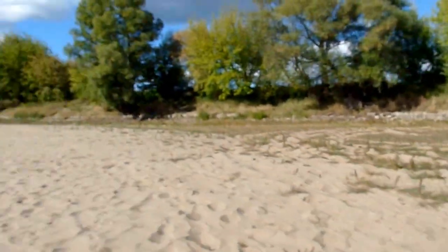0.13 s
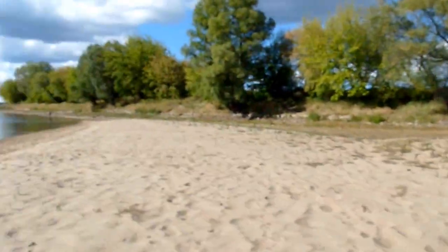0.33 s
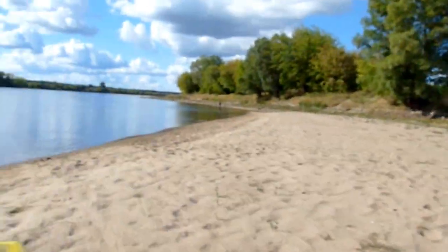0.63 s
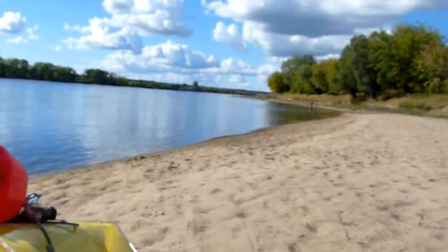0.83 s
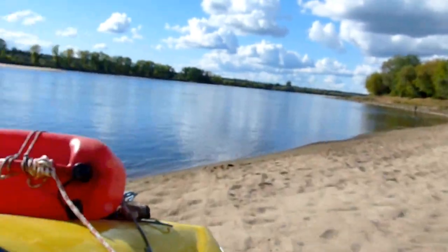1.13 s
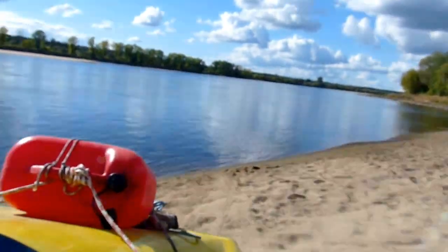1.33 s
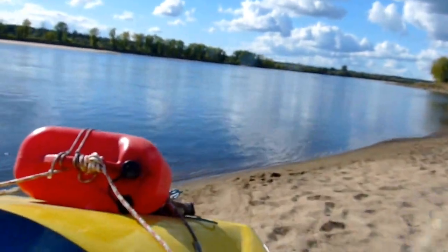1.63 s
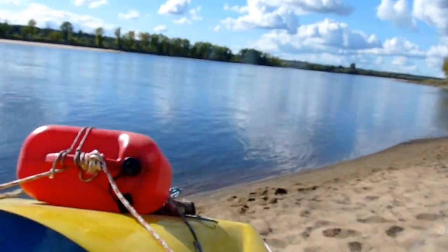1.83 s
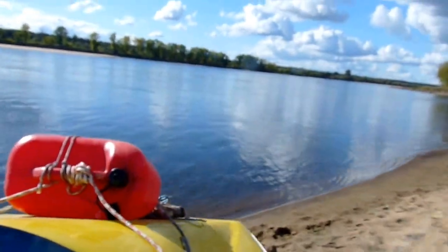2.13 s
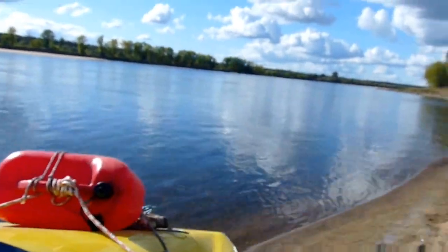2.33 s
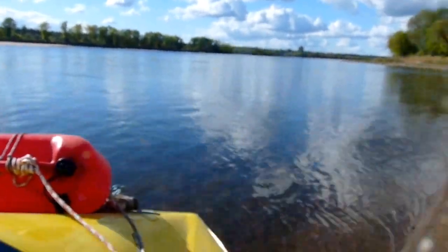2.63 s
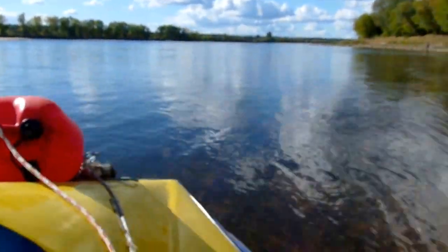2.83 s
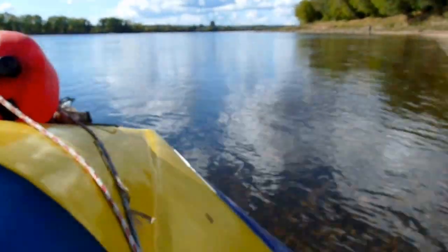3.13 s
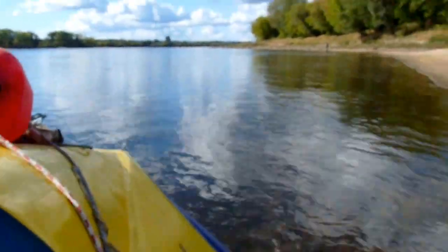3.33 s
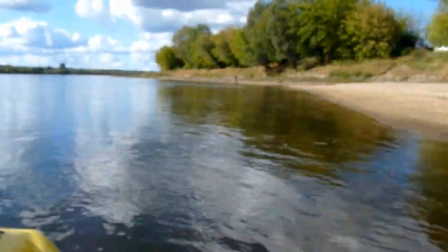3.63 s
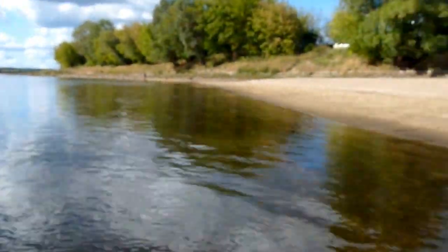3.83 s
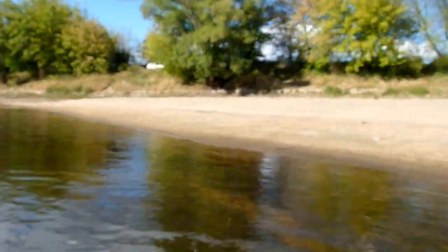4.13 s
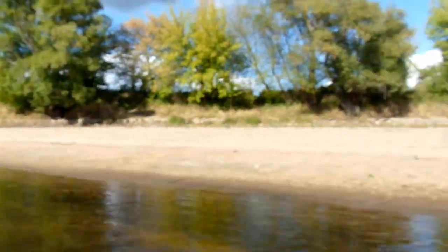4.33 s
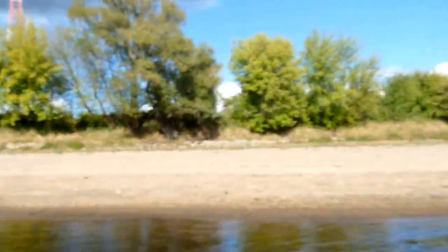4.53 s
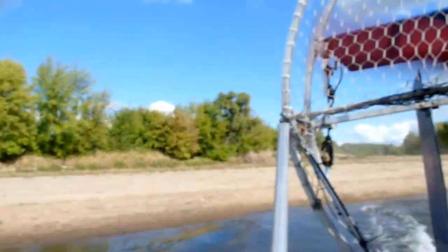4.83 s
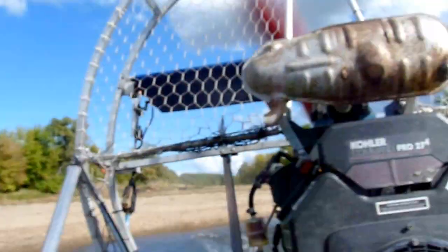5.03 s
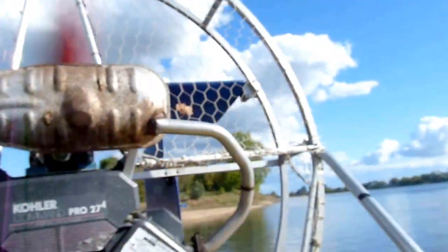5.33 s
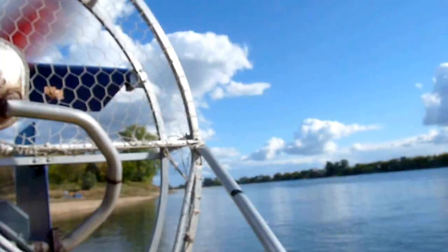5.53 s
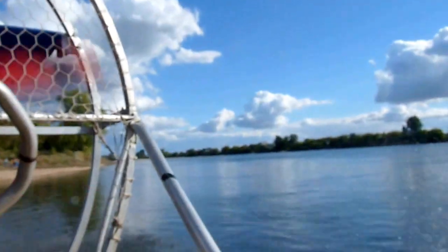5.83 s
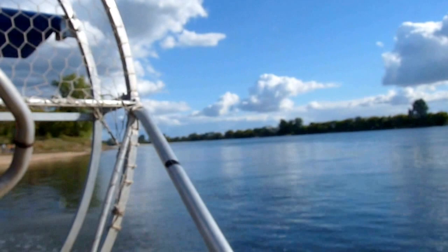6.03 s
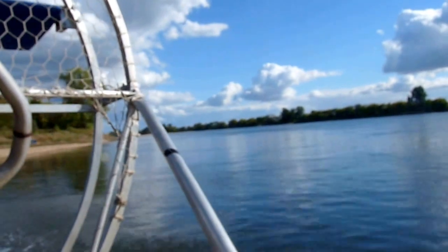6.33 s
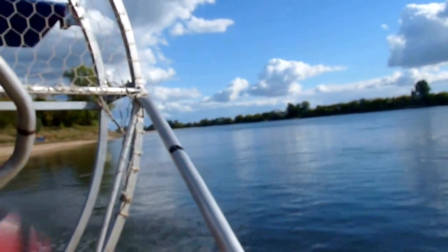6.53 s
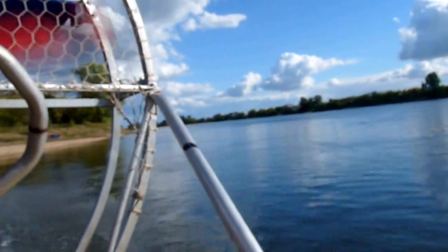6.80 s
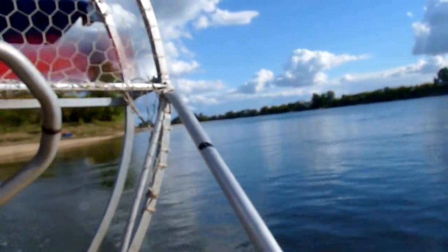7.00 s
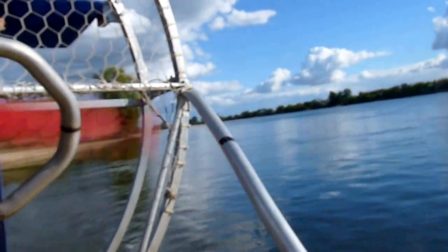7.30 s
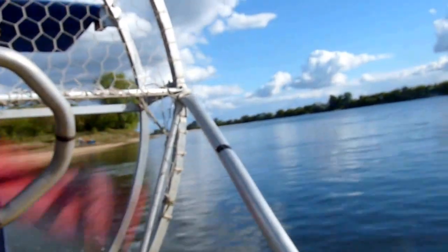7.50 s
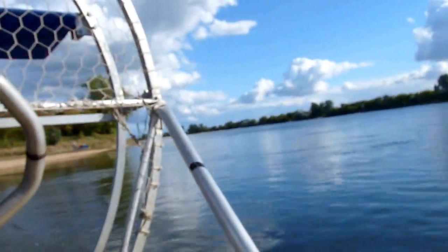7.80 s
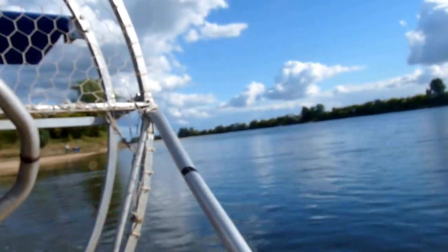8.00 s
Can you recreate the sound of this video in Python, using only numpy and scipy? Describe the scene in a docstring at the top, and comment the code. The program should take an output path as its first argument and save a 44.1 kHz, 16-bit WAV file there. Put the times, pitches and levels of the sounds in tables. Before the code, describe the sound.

A small hovercraft runs loud and close, heard from on board. A buzzing drive engine and rapidly slapping propeller sit over a steady lift engine drone and the throbbing rumble of escaping air. The skirt scrapes over sand in the first second, then fades away by 3 seconds. From about 0.8 seconds the drive engine eases off, reaching its lowest pitch near 2.2 seconds, then winds up again, regaining its starting pitch around 4 seconds. Soft low thuds and gusts dot the rumble between 1 and 4.4 seconds, with a faint hiss of spray near 3.6. From 4.2 to 5.6 seconds the microphone swings toward the propeller, and its rushing wash grows louder and hissier. A loose fitting taps lightly near 6.1. The engine levels off at a high pitch around 7 seconds and holds until about 8. Wind causes occasional split-second dropouts.

```python
"""On board a small hovercraft sliding off a beach onto a river. The drive engine eases off, then winds up;
its caged propeller slaps the air on every turn and blows a rushing wash. A lift engine drones steadily
and fills the air cushion, while the skirt around it leaks air and drags over the sand. Soft low thuds
dot the rumble. The microphone swings from the bow (front) to face the propeller at the stern (back).
Wind makes the sound drop out for instants, and a limiter flattens the peaks."""
import sys
import numpy as np
from scipy import signal
from scipy.fft import rfft, irfft, next_fast_len
from scipy.io import wavfile
from scipy.ndimage import uniform_filter1d, minimum_filter1d

SR = 44100
rng = np.random.default_rng(int(sys.argv[2]) if len(sys.argv) > 2 else 0)


def file_out(sig):
    """Save sig as 16-bit WAV at sys.argv[1]."""
    # one column per channel
    cols = np.atleast_2d(sig).T
    # limit, then scale
    lim = np.clip(cols, -1, 1)
    pcm = np.round(lim * 32767).astype(np.int16)
    wavfile.write(sys.argv[1], SR, pcm)


N = 359856
TIME = np.arange(N) / SR
CRUISE_HZ = 56   # turns per second of the drive engine when cruising


# The drive engine's tones. Each row: multiple of the engine speed, then its level in dB in each of
# six beams (ways the sound spreads): beach, bow, quarter (part way round), side, cage, stern.
DRIVE_TONES = [(1, -48, -46, -46, -45, -52, -52), (2, -42, -48, -45, -38, -39, -43),
               (3, -45, -44, -45, -33, -39, -42), (4, -38, -41, -36, -39, -31.5, -32),
               (5, -44, -35, -43, -29, -37, -41), (6, -46, -40, -33, -45, -30.5, -32.5),
               (7, -42, -44, -39.5, -37, -28.5, -32), (8, -39, -44, -40, -31, -31, -34),
               (9, -41, -47, -46, -42, -29, -29.5), (10, -39, -40, -45, -37, -37, -37),
               (11, -46, -46, -38.5, -43, -41, -39.5), (12, -38, -43, -45, -35, -44, -45),
               (13, -44, -54, -43.5, -47, -35, -37.5), (14, -37.5, -49, -47, -42, -41.5, -37.5),
               (15, -41, -56, -49, -51, -42.5, -37), (16, -43, -56, -51, -47, -45, -43),
               (18, -56, -59, -52, -51, -42, -43), (22, -57, -62, -58, -53, -46, -46),
               (24, -60, -65, -60, -54, -49, -49), (30, -66, -71, -67, -57, -53, -53),
               (36, -74, -80, -76, -66, -60, -60)]
# Which beam is heard. Each row: time in seconds, beam number from 0 (beach) to 5 (stern).
BEAM_HEARD = [(.6, 0), (1.05, 1), (2.5, 1), (3.1, 2), (4.05, 2), (4.55, 3), (5.1, 3), (5.5, 4), (6.35, 4),
              (7.1, 5)]
def drive_engine(angle, speed, facing, waver_db, uneven_db, scatter):
    """Exhaust and blades hum at multiples of the engine speed; unequal firings add weak tones between."""
    multiples, *beams = np.transpose(DRIVE_TONES)
    beam, = in_time(BEAM_HEARD)
    # heard towards the stern, the muffler's resonance lifts each tone that passes through it
    muffler_hz, width_hz, muffler_db = 479, 7.9, 3 * np.minimum(2 * facing, 1)
    hum = np.zeros(N)
    for k in np.r_[np.arange(1, 37), np.arange(1.5, 14)]:
        beam_levels = [np.interp(k, multiples, levels) for levels in beams]
        db = np.interp(beam, np.arange(len(beams)), beam_levels)
        db += muffler_db / (1 + ((k * speed - muffler_hz) / width_hz) ** 2)
        db += uneven_db * (k % 1 > 0) + waver_db * drift(7.6)
        hum += from_db(db) * shaft_tone(angle, k, scatter)
    speed_db = np.log2(speed / CRUISE_HZ)   # 1 dB louder when the speed doubles
    idle_dip_db = swell(centre_s=1.8, length_s=0.27)   # 1 dB softer with the throttle shut
    return hum * from_db(2 + speed_db - idle_dip_db)


# How hard the propeller slaps, hardest on the beach. Each row: time in seconds, level in dB.
SLAP_LEVEL = [(0, -16), (.27, -28.5), (.55, -18), (.85, -28), (1.1, -40.5), (3.2, -33), (4.2, -26),
              (5.5, -24.5)]
# Single harder slaps. Each row: start in seconds, level in dB.
EXTRA_SLAPS = [(.256, -20), (.291, -15), (.381, -9), (.841, -16), (1.089, -19), (1.247, -19), (2.64, -23),
               (3.278, -21), (3.527, -18), (3.731, -13), (4.273, -11), (4.329, -17)]
# How the cage rings. Each row: pitch in Hz, level in dB, seconds to fade by 60 dB.
CAGE_RING = [(800, 0.5, 0.014), (1180, -6, 0.0071), (1850, -11.5, .003)]
def blade_slap(angle, uneven_db):
    """Once a turn the propeller slaps the air: a soft puff, never twice equally hard, rings the cage."""
    passes = np.diff(np.floor(angle / (2 * np.pi)), prepend=0)
    strength = from_db(in_time(SLAP_LEVEL)[0] + uneven_db * drift(69))
    puffs = passes * strength + clicks_at(EXTRA_SLAPS) + 1e-18
    soften = signal.butter(3, 2000, fs=SR, output="sos")
    return ring(signal.sosfilt(soften, puffs), CAGE_RING)


def blade_flow(angle, lift_angle, chop, lift_chop):
    """The churning of the air swells sharply once a propeller turn, and a little with the lift engine."""
    pulse = ((1 + np.cos(angle)) / 2) ** 6
    return np.exp(chop * pulse + lift_chop * np.cos(2 * lift_angle))


# The tone colour of the rush. Each row: frequency in Hz, relative level in dB.
RUSH_COLOUR = [(25, 0.5), (100, -9.5), (170, 4.5), (250, 6), (380, 6.5), (600, 4.5), (850, 2.5), (1200, -1),
               (1700, -3.5), (2400, -12.5), (3100, -22), (4000, -36), (5200, -51), (8000, -66.5)]
# How its treble rises and falls. Each row: time in seconds, change in dB.
RUSH_TREBLE = [(1, 1), (1.15, -1), (1.6, 1), (2.1, 2), (2.6, 1), (3.7, 1), (3.85, -0.5), (4.15, -3.5),
               (4.4, -2), (4.9, 0.2), (5.6, 1), (6.6, 1)]
def propeller_rush(flow, treble_from_hz=1100):
    """The air thrown back by the propeller roars, now brighter, now duller."""
    roar = air_noise(RUSH_COLOUR, flow)
    highs_only = signal.butter(3, treble_from_hz, "high", fs=SR, output="sos")
    treble = signal.sosfiltfilt(highs_only, roar)
    return roar + (from_db(in_time(RUSH_TREBLE)[0]) - 1) * treble


# The lift engine's tones. Each row: multiple of its speed, level in dB facing bow, side and stern.
LIFT_TONES = [(1, -48, -52, -55), (1.5, -47, -50, -53), (2, -36, -38.5, -45), (2.5, -42, -41, -50),
              (3.5, -41, -44, -51), (4, -43, -37, -47), (4.5, -36, -38, -40), (5, -34.5, -35.5, -34),
              (6, -33.5, -28.2, -27.3), (6.5, -45, -41, -42), (7, -45, -48, -47), (9, -49, -46, -43),
              (12, -37.8, -41, -39), (18, -53, -44, -41), (24, -55, -53, -48)]
def lift_engine(angle, facing, waver_db, scatter):
    """A four-stroke engine drones; its fan's blades sing at six times the engine speed."""
    drone = np.zeros(N)
    for multiple, *levels in LIFT_TONES:
        db = np.interp(facing, [0, .5, 1], levels) + waver_db * drift(3.4)
        drone += from_db(db) * shaft_tone(angle, multiple, scatter)
    return drone


# The tone colour of the escaping air. Each row: frequency in Hz, relative level in dB.
CUSHION_COLOUR = [(20, -18.5), (40, -13.5), (65, -1.5), (110, 3), (170, 0.5), (250, 3.5), (340, -2),
                  (430, -7), (560, -5), (720, -15.5), (1100, -19), (2500, -62.5)]
def air_cushion(angle, eddies, throb, beat, gust_db):
    """Air escapes under the skirt in lumps, pulsing with each lift engine turn and each two-turn cycle."""
    pulsing = 1 + throb * np.cos(angle / 2) + beat * np.cos(angle)
    return air_noise(CUSHION_COLOUR, pulsing * from_db(gust_db * eddies))


# The cushion starts softer. Each row: time in seconds, change in dB.
CUSHION_RISE = [(.45, -5.5), (.62, 0)]
# Gusts of wash sweep over the microphone.
# Each row: middle in seconds, length in seconds, dB added to the cushion, dB added to the rush.
WASH_GUSTS = [(0.662, 0.049, -1.5, 0.5), (1.907, 0.12, 2, 4), (2.491, 0.03, 5, 2.5), (3.742, 0.023, 6, 1.5),
              (4.208, 0.051, 0.5, 3), (4.265, 0.024, 6, 4), (4.334, 0.015, 8, 6)]
def air_levels(octaves, facing):
    """Cushion and rush levels in dB: the rush grows with speed and takes over as the microphone turns."""
    shore_db = 2.5 * swell(centre_s=2.4, length_s=0.57)   # more air spills at the water's edge
    cushion_db = -22.5 + shore_db - 6 * facing ** 2 + in_time(CUSHION_RISE)[0]
    propeller_in_view = np.clip((facing - 0.15) / 0.45, 0, 1)
    rush_db = -31 + 11 * octaves + 8 * propeller_in_view
    for s, length, on_cushion_db, on_rush_db in WASH_GUSTS:
        gust = swell(s, length)
        cushion_db += on_cushion_db * gust
        rush_db += on_rush_db * gust
    return cushion_db, rush_db


# Low thuds in the rumble. Each row: start in seconds, pitch in Hz, level in dB.
LOW_THUDS = [(1.059, 120, -12), (1.393, 236, -15), (1.508, 161, -13), (1.872, 235, -7.5), (2.088, 215, -19),
             (2.466, 148, -7), (2.912, 283, -12.5), (3.155, 124, -12), (3.784, 153, -19),
             (4.196, 205, -6.5)]
def low_thuds(fade_s=0.078, soften_above_hz=400):
    """Soft low thuds in the rumble of the air, each dying quickly."""
    thuds = sum(ring(clicks_at([(s, db)]), [(hz, 0, fade_s)]) for s, hz, db in LOW_THUDS)
    return signal.sosfilt(signal.butter(2, soften_above_hz, fs=SR, output="sos"), thuds)


# How loudly the skirt drags. Each row: time in seconds, level in dB.
DRAG_LEVEL = [(0, -30), (.6, -33.5), (1, -47), (1.4, -49.5), (2.5, -50), (3, -69)]
# The tone colour of the scraping. Each row: frequency in Hz, relative level in dB.
SAND_COLOUR = [(300, -18), (520, -1), (800, 6), (1100, -2.5), (1600, -15), (3000, -49)]
def sand_drag(flow):
    """The skirt scrapes over dry sand, fading as the craft leaves the beach."""
    return from_db(in_time(DRAG_LEVEL)[0]) * air_noise(SAND_COLOUR, flow)


# The tone colour of blade tips and spray. Each row: frequency in Hz, relative level in dB.
HISS_COLOUR = [(1500, 1.5), (2600, 5.5), (3400, -1.5), (4200, -11), (5200, -18), (7500, -36)]
def blade_tips(flow, octaves, facing):
    """The blade tips hiss, louder as they speed up and as the microphone turns to them."""
    return from_db(-60 + 15.5 * octaves + 17.5 * facing) * air_noise(HISS_COLOUR, flow)


# A burst of spray. Each row: middle in seconds, length in seconds, level in dB.
SPRAY_BURSTS = [(3.62, .13, -54)]
def water_spray(flow):
    """Spray hisses briefly off the skirt."""
    loudness = sum(from_db(db) * swell(s, length) for s, length, db in SPRAY_BURSTS)
    return loudness * air_noise(HISS_COLOUR, flow)


# The taps of the fittings. Each row: start in seconds, level in dB.
FITTING_TAPS = [(1.273, -36), (1.493, -34), (6.1044, -24.5)]
# How they ring. Each row: pitch in Hz, level in dB, seconds to fade by 60 dB.
FITTING_RING = [(1910, -18, 0.018), (2560, -3, 0.018), (3250, -27, .02)]
def loose_fittings():
    """Loose fittings tap the frame and ring briefly."""
    return ring(clicks_at(FITTING_TAPS), FITTING_RING)


def from_db(db):
    """Turn decibels into a factor to multiply by."""
    return 10 ** (np.asarray(db) / 20)


def rms_one(x):
    """Scale a signal to an average power of 1."""
    return x / np.sqrt(np.mean(x ** 2) + 1e-20)


def in_time(rows):
    """Join a table's timed rows with straight lines: one curve for each column after the time."""
    s, *columns = np.transpose(rows)
    return [np.interp(TIME, s, column) for column in columns]


def swell(centre_s, length_s):
    """A bell-shaped rise and fall of height 1."""
    return np.exp(-((TIME - centre_s) / length_s) ** 2)


def drift(rate_hz):
    """A smooth random wander, typically about 1 in size."""
    r = np.exp(-80 * np.pi * rate_hz / SR)
    noise = rng.standard_normal(N // 40 + 2002)   # one value for every 40 samples
    slow = signal.lfilter([1], [1, -2 * r, r * r], noise)[2000:]
    return np.interp(np.arange(N) / 40, np.arange(len(slow)), rms_one(slow))


def air_noise(colour, flow):
    """Noise that swells with the flow, given a tone colour and an average power of 1."""
    noise = rng.standard_normal(N) * flow
    size = next_fast_len(N)
    hz = np.maximum(np.arange(size // 2 + 1) * SR / size, 1)
    colour_hz, colour_db = np.transpose(colour)
    gain = from_db(np.interp(np.log(hz), np.log(colour_hz), colour_db))
    bass_fade = np.minimum(hz / colour_hz[0], 1) ** 2
    return rms_one(irfft(rfft(noise, size) * bass_fade * gain, size)[:N])


def shaft_angle(speed, jitter):
    """How far a shaft has turned, in radians, at a slightly uneven speed."""
    return 2 * np.pi * np.cumsum(speed * (1 + jitter * drift(14.4))) / SR


def shaft_tone(angle, multiple, scatter):
    """One tone at a multiple of a shaft's speed; the moving air shakes its timing."""
    return np.sqrt(2) * np.sin(multiple * angle + rng.uniform(0, 2 * np.pi) + scatter * drift(29))


def clicks_at(rows):
    """One click for each row of start in seconds and level in dB."""
    clicks = np.zeros(N)
    for s, db in rows:
        clicks[round(s * SR)] = from_db(db)
    return clicks


def ring(clicks, tones):
    """Each click sets off a group of fading tones."""
    out = np.zeros(N)
    for hz, db, fade_s in tones:
        decay, step = from_db(-60 / (fade_s * SR)), 2 * np.pi * hz / SR
        feedback = [1, -2 * decay * np.cos(step), decay * decay]
        out += from_db(db) * signal.lfilter([0, np.sin(step)], feedback, clicks + 1e-18)
    return out


# The speeds of the two engines. Each row: time in seconds, turns per second.
DRIVE_TURNS = [(0.0, 55.7), (0.8, 56.4), (1.3, 48.0), (1.7, 44.1), (2.2, 39.7), (2.65, 42.7), (3.3, 51.2),
               (3.9, 56.4), (4.25, 57.8), (4.5, 59.1), (4.87, 60.4), (5.14, 62.5), (5.4, 65.3),
               (5.75, 67.5), (6.1, 68.7), (6.82, 70.2), (8.16, 70.7)]
LIFT_TURNS = [(0, 48.8), (2.9, 48.7), (3.3, 48), (5.2, 47.7), (6, 48.4), (8.16, 49.2)]
# Where the microphone points. Each row: time in seconds, direction (0 bow, 0.5 side, 1 propeller).
MIC_FACING = [(0, 0), (3.6, 0), (4.2, .05), (4.52, .43), (5.05, .67), (5.6, 1)]
def scene():
    """Two engines and the air that they move, all close by."""
    speed, = in_time(DRIVE_TURNS)
    facing, = in_time(MIC_FACING)
    octaves = np.log2(speed / CRUISE_HZ)   # doublings above cruising speed
    cushion_db, rush_db = air_levels(octaves, facing)
    drive_angle = shaft_angle(speed, jitter=0.0014)
    lift_angle = shaft_angle(in_time(LIFT_TURNS)[0], jitter=0.0022)
    eddies = drift(61)   # swirls in the air
    drive = drive_engine(drive_angle, speed, facing, waver_db=1.1, uneven_db=-17, scatter=.16)
    slap = blade_slap(drive_angle, uneven_db=-0.5)
    lift = from_db(2.0) * lift_engine(lift_angle, facing, waver_db=1.85, scatter=0.14)
    cushion = from_db(cushion_db) * air_cushion(lift_angle, eddies, throb=0.3, beat=0.28, gust_db=1.0)
    # the chop is plainest from the bow; close to the cage the wash smears it
    chop = .65 - 0.11 * facing
    flow = blade_flow(drive_angle, lift_angle, chop, lift_chop=0.061) * from_db(0.22 * eddies)
    rush = from_db(rush_db) * propeller_rush(flow)
    hisses = blade_tips(flow, octaves, facing) + sand_drag(flow) + water_spray(flow)
    return (drive + slap + lift + cushion + rush + hisses + loose_fittings() + low_thuds())[None]


# The hardest hits of wind on the microphone. Each row: middle in seconds, length in seconds.
WIND_HITS = [(1.581, 0.0049), (2.201, 0.0031), (3.123, 0.0064), (3.388, 0.0043), (3.765, 0.0051),
             (4.234, 0.0054), (4.293, 0.0055), (4.379, 0.005), (7.728, 0.0033)]
def wind_overload(x, wind_db, hit_pressure):
    """Wind too deep to hear pushes the microphone to its limit, where it goes deaf for a moment."""
    pressure = from_db(wind_db) * np.abs(drift(96))
    for s, length in WIND_HITS:
        pressure = np.maximum(pressure, hit_pressure * swell(s, length / 2))
    return x / (1 + pressure ** 4)


def limiter(x, ceiling_db, hold_s):
    """The volume ducks sharply round each peak, which packs the loud roar dense."""
    size = int(hold_s * SR)
    gain = (1 + (x / from_db(ceiling_db)) ** 12) ** (-1 / 12)
    held = minimum_filter1d(gain, size)
    return x * uniform_filter1d(uniform_filter1d(held, size // 2), size // 2)


def record(dry):
    """A microphone in the wind: overload, limiter, faint electronic hiss and whine, trimmed extremes."""
    bass_cut_hz, whine_hz, treble_cut_hz = 28, 6667, 7900
    x = wind_overload(dry * from_db(-1.08), wind_db=-6.5, hit_pressure=3.1)
    x = limiter(x, ceiling_db=-12.3, hold_s=.0016)
    x = signal.sosfilt(signal.butter(2, bass_cut_hz, "high", fs=SR, output="sos"), x)
    hiss = from_db(-65) * rng.standard_normal(N)
    whine = from_db(-86) * np.sqrt(2) * np.sin(2 * np.pi * whine_hz * TIME)
    return signal.sosfilt(signal.ellip(10, .2, 80, treble_cut_hz, fs=SR, output="sos"), x + hiss + whine)


dry = scene()
out = record(dry)
file_out(out)
```